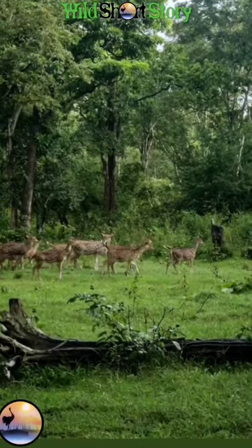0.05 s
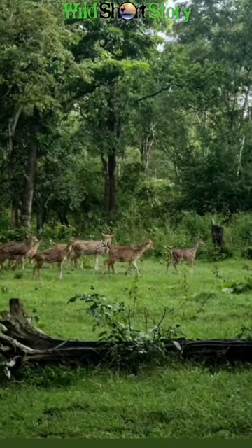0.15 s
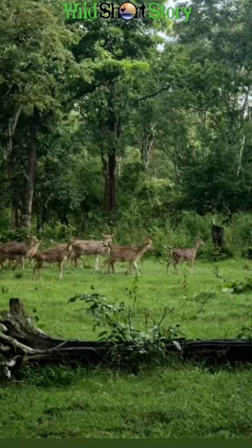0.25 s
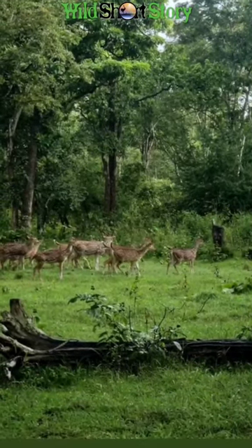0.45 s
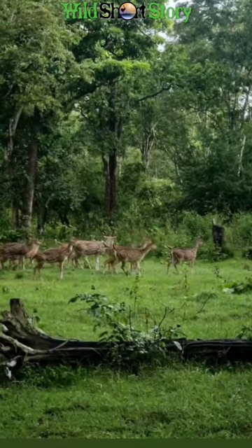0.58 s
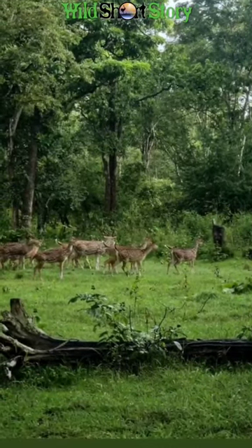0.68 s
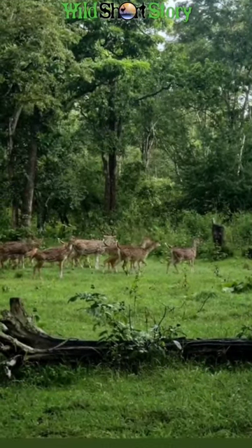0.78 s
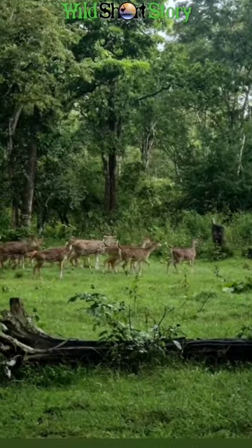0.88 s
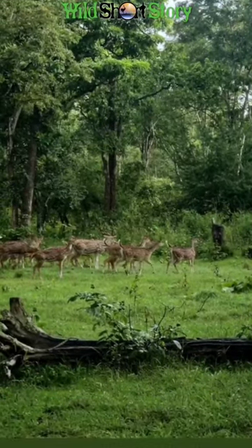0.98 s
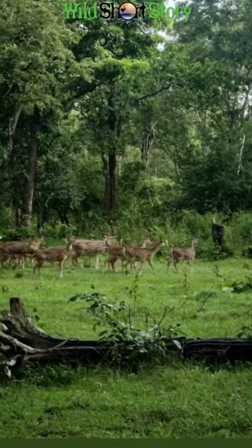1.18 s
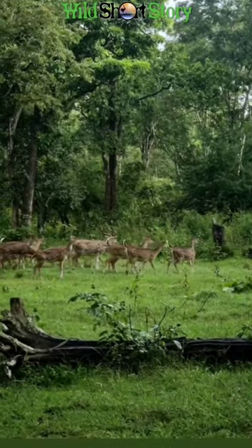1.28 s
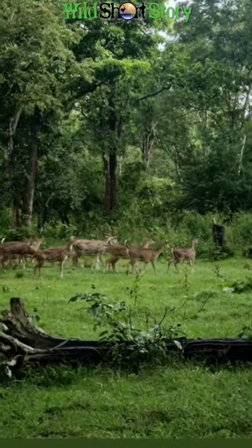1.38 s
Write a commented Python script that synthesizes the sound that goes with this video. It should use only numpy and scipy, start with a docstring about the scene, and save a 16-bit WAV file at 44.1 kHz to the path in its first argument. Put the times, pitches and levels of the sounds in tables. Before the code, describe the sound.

One piercing deer bark arches in pitch, drops hoarsely and rings on among the trees around a clearing. Behind it, insects buzz steadily over a faint outdoor rumble, with a few soft rustles and a small dry crunch.

```python
"""A soft rustle, a thin squeak and a faint hollow ring lead into a spotted deer's shrill alarm bark.
The bark is a harmonic tone that arches in pitch, modulated by a flutter of the throat, then drops and
turns hoarse. Reflections from the trees around the clearing prolong it for a second.
Insects buzz steadily over a faint outdoor rumble; a few more rustles and a dry crunch pass."""
import sys
import numpy as np
from scipy import signal
from scipy.fft import rfft, irfft
from scipy.io import wavfile
from scipy.ndimage import uniform_filter1d

SR = 44100
rng = np.random.default_rng(int(sys.argv[2]) if len(sys.argv) > 2 else 0)


def unload_audio(sound):
    """Save the sound as a 16-bit wav file, at the path given as the first command line argument."""
    columns = np.transpose(np.atleast_2d(sound))
    # keep every value between -1 and 1, then stretch to whole-number steps
    steps = np.round(np.clip(columns, -1, 1) * 32767)
    wavfile.write(sys.argv[1], SR, steps.astype(np.int16))


N = 63945


def bark(t):
    """Source and filter: throat resonances weight four harmonics, modulated in amplitude and frequency."""
    # course of the call: t/s, f/Hz, level/dB, hoarseness (scales jitter and shimmer)
    contour = [(0.197, 987.4, -3.5, .05), (0.215, 1069, 2, 0), (0.233, 1069, -2, 0.01),
               (0.271, 1057, 2, 0.01), (0.299, 1024, -2.5, 0), (0.33, 978, -7.5, 0.14),
               (0.353, 903.2, -3, 0.83), (0.386, 776.6, -6.5, -0.5), (0.42, 684, -14, 0.6)]
    # resonance curve of the throat: f/Hz, level/dB
    throat = [(620, -10.5), (950, -5.5), (1140, -2.5), (1260, -10.5), (1550, -19), (1850, -2), (2080, -1),
              (2290, -0.5), (2480, -27), (2800, -15), (3070, -22.5), (3300, -27.5), (4400, -48)]
    # spectrum of the rasp: f/Hz, level/dB
    rasp_spectrum = [(60, -36), (190, -3.5), (330, -2.5), (500, -11.5), (900, 4), (1400, -5), (1900, 9.5),
                     (2550, -3.5), (3100, -9), (3900, -12), (7000, -30), (14000, -26.5)]
    attack_s, release_s, swell_s = 0.001, 0.013, 0.02
    flutter_hz, flutter_depth, swing_hz = 83.54, 0.55, 62.1
    when, *columns = np.array(contour).T
    pitch, db, hoarse = (np.interp(t, when, column) for column in columns)
    gate = np.clip((t - when[0]) / attack_s, 0, 1) * np.clip(1 - (t - when[-1]) / release_s, 0, 1)
    cycles = np.cumsum(flutter_hz * (1 + 0.028 * walk(78.74)) * (t > when[0])) / SR
    flutter = -np.cos(2 * np.pi * cycles)
    shimmer = undb(5 * hoarse * walk(250))
    opening = np.maximum(1 + flutter_depth * flutter, 0) * shimmer
    jitter = 0.0803 * hoarse * walk(350)
    phase = 2 * np.pi * np.cumsum(pitch * (1 + jitter) + swing_hz * flutter) / SR
    fundamental = (1 - np.exp(-np.maximum(t - when[0], 0) / swell_s)) * np.sin(phase)
    overtones = sum(np.sin(k * phase) for k in range(2, 5))
    tone = colour((fundamental + overtones) * opening, throat)
    rasp = undb(-21) * unit(colour(rng.standard_normal(N), rasp_spectrum)) * opening
    pulses = np.diff(np.floor(cycles), prepend=0)  # one per flutter cycle
    burr = undb(-28) * unit(resonance(pulses, hz=292.7, width_hz=96))
    return undb(db - 18) * gate * (tone + rasp + burr)


def forest(call, t):
    """Reverberation: scattering by trunks adds echoes and an exponential tail, longest in the middle."""
    # reverberant bands: f/Hz, reverberation time T60/s, level/dB
    bands = [(324, .6, -20), (694, 1.24, 3), (1130, 1.85, 3.5), (1500, 1.4, 2), (2250, 1.26, -5),
             (3300, 0.87, 5.5), (12000, 0.54, 7)]
    # echoes off nearby trunks and the forest edge: delay t/s, level/dB
    echoes = [(0.017, -5.5), (0.063, -9), (0.141, -8.5), (0.26, -21.5)]
    build_s, smear_s, width = 0.0068, 0.012, 0.56
    hz, t60, db = np.array(bands).T
    scatter, response = wide_noise(width), 0
    for k, share in enumerate(np.eye(len(hz))):
        fade = (1 - np.exp(-t / build_s)) * np.exp(-np.log(1000) * t / t60[k])
        band = shape(scatter, lambda f: np.interp(np.log(f), np.log(hz), share))
        response += undb(db[k]) * band * fade / np.linalg.norm(fade)
    for delay, echo_db in echoes:
        fade = (t > delay) * np.exp(-np.abs(t - delay) / smear_s)
        response += undb(echo_db) * wide_noise(width) * fade / np.linalg.norm(fade)
    return signal.fftconvolve(call[None], response, axes=1)[:, :N] * pan(db=-2.5)


def rustles(t):
    """Amplitude-modulated noise makes grainy swishes; spectral tilt sets each one crisp or dull."""
    # swishes: onset t/s, attack/s, hold/s, decay/s, level/dB, tilt/(dB per octave)
    swishes = [(0.068, 0.048, 0.029, 0.027, -43.5, 1.5), (0.175, 0.013, 0.014, 0.037, -42.5, 0),
               (0.345, 0.069, .02, 0.018, -71, -13), (0.528, 0.014, 0.041, 0.015, -45, 0.5),
               (0.884, 0.013, 0.014, .025, -48, 0.5), (0.896, 0.011, 0.064, 0.053, -53, -4.5)]
    # their spectrum before tilting: f/Hz, level/dB
    spectrum = [(30, -56), (75, -0.5), (130, -5), (220, 3.5), (400, 2), (800, 7), (1450, -0.5), (1900, 7),
                (2550, 0), (3700, -4), (8000, -35.5), (14000, -46)]
    hz = np.array(spectrum)[:, 0]
    out = 0
    for start, attack, hold, decay, db, tilt in swishes:
        swish = unit(colour(wide_noise(0.27), spectrum))
        swish = colour(swish, np.column_stack([hz, tilt * np.log2(hz / 1000)]))
        out += swish * envelope(t, start, attack, hold, decay) * undb(db + 1.8 * walk(200))
    return out * pan(db=-3.5)


def crunch(t):
    """A broadband transient with exponential decay sounds dry, like a crushed leaf."""
    # spectrum: f/Hz, level/dB
    spectrum = [(500, -14), (2400, -2), (3900, 0), (5500, -5), (10000, -15), (14000, -12)]
    fade = envelope(t, start_s=0.888, attack_s=0.012, hold_s=0, decay_s=0.025)
    return unit(colour(wide_noise(1.0), spectrum)) * fade * undb(-50 + 2 * walk(500))


def squeak(t):
    """Noise confined to a narrow band takes on a pitch: a brief, thin whistle."""
    peak_s, half_length_s = 0.117, 0.021
    swell = np.exp(-((t - peak_s) / half_length_s) ** 4)
    whistle = unit(resonance(wide_noise(0.27), hz=3060, width_hz=230))
    return undb(-40) * swell * whistle * pan(db=-6)


def hollow_ring(t):
    """Two noise-driven resonances sound faintly ahead of the bark and fade beneath it."""
    # resonances: f/Hz, bandwidth/Hz, level/dB
    bands = [(1138, 190, -51.5), (1834, 270, -49)]
    # their common envelope: t/s, level/dB
    levels = [(0, 6), (.07, -3.5), (.11, 5.5), (.14, 7), (.19, 6.5), (.32, -40)]
    ring = sum(undb(db) * unit(resonance(wide_noise(0.85), hz, width)) for hz, width, db in bands)
    return ring * undb(np.interp(t, *np.array(levels).T)) * pan(db=-0.5)


def insects():
    """Incoherent addition: insect choruses merge into two flickering noise bands, one to each side."""
    # choruses: f/Hz, bandwidth/Hz, level/dB, left minus right/dB, flicker/dB
    choruses = [(5547, 435, -44.5, -6, 1), (7940, 710, -58.5, 15.5, 0.8)]
    out = 0
    for hz, width, db, side, flicker in choruses:
        buzz = unit(resonance(wide_noise(0.98), hz, width))
        out += buzz * undb(db + flicker * walk(130)) * pan(side)
    return out


def air():
    """Ambient noise has a continuous spectrum: a gently wavering rumble under a thin, diffuse hiss."""
    # relative spectral density of the outdoor air: f/Hz, level/dB
    spectrum = [(25, -14), (50, -3.5), (82, 2.5), (125, -12), (250, -20.5), (500, -24), (1100, -13.5),
                (1500, -29.5), (2000, -17.5), (3300, -18), (4300, -21), (9000, -17), (10300, -64.5)]
    rumble = unit(colour(wide_noise(0.77), spectrum)) * undb(-52 + 0.7 * walk(9.2))
    hiss = undb(-67.5) * unit(resonance(wide_noise(0.6), hz=13400, width_hz=2600))
    return rumble * pan(db=-3.5) + hiss


def envelope(t, start_s, attack_s, hold_s, decay_s):
    """Linear rise, plateau and exponential decay."""
    rise = np.clip((t - start_s) / attack_s, 0, 1)
    return rise * np.exp(-np.maximum(t - start_s - attack_s - hold_s, 0) / decay_s)


def undb(db):
    """Amplitude ratio of a level in decibels."""
    return 10 ** (np.asarray(db) / 20)


def unit(x):
    """Normalisation to rms 1."""
    return x / np.sqrt(np.mean(x ** 2))


def shape(x, gain_at):
    """Zero-phase filtering: the spectrum is multiplied by a gain that depends on frequency."""
    size = 2 * x.shape[-1]
    hz = np.maximum(np.fft.rfftfreq(size, 1 / SR), 1)
    return irfft(rfft(x, size) * gain_at(hz))[..., :size // 2]


def colour(x, points):
    """Spectral weighting through (f/Hz, level/dB) points, interpolated in log frequency."""
    hz, db = np.array(points).T
    return shape(x, lambda f: undb(np.interp(np.log(f), np.log(hz), db)))


def resonance(x, hz, width_hz):
    """Band-pass with the squared magnitude response of a damped oscillator."""
    return shape(x, lambda f: 1 / (1 + ((f * f - hz * hz) / (f * width_hz)) ** 2))


def walk(rate_hz):
    """Smooth random fluctuation with a standard deviation near 1."""
    hold = max(int(SR / rate_hz), 1)
    steps = rng.standard_normal(N)[np.arange(N) // hold]
    return 1.3 * uniform_filter1d(uniform_filter1d(steps, hold), hold)


def pan(db):
    """Channel gains for a level difference, left minus right."""
    return undb(np.array([[db], [-db]]) / 2)


def wide_noise(width):
    """Partly correlated stereo noise; width is the amplitude ratio of side to mid."""
    mid, side = rng.standard_normal((2, N))
    return np.array([mid + width * side, mid - width * side]) / np.hypot(1, width)


def scene():
    """Superposition of the direct bark, its reverberation and the sounds of the clearing."""
    t = np.arange(N) / SR
    call = bark(t)
    deer = call * pan(db=-3.5) + forest(call, t)
    return deer + insects() + rustles(t) + crunch(t) + squeak(t) + hollow_ring(t) + air()


def record(dry):
    """Band limiting: a steep elliptic low-pass removes the highest treble."""
    cutoff_hz = 15050
    return signal.sosfilt(signal.ellip(10, .1, 80, cutoff_hz, fs=SR, output="sos"), dry)


dry = scene()
out = record(dry)
unload_audio(out)
```